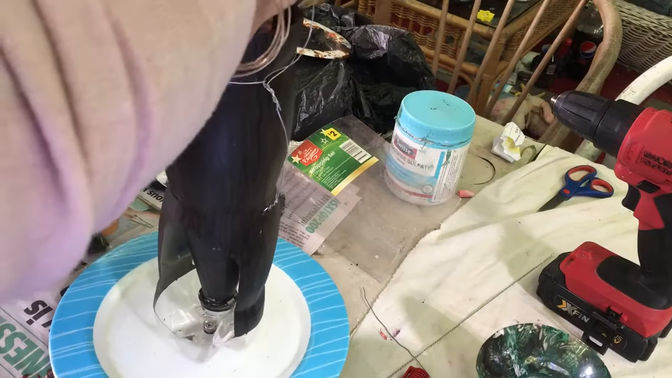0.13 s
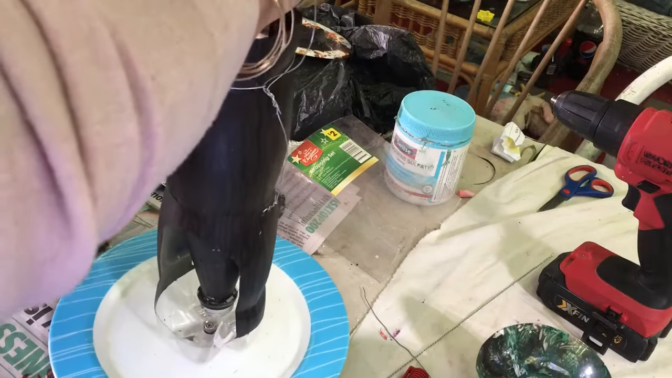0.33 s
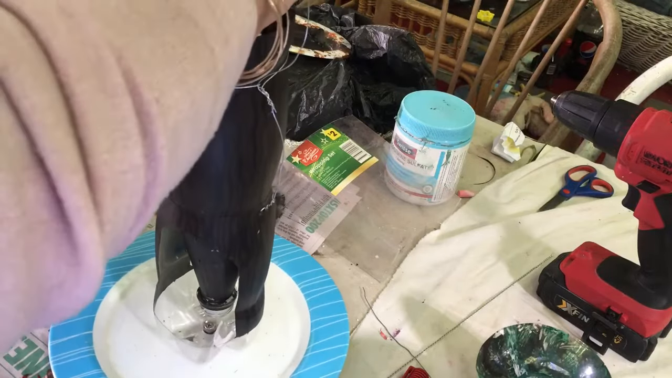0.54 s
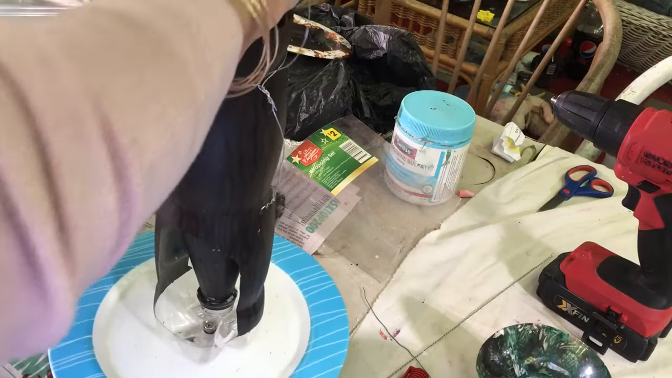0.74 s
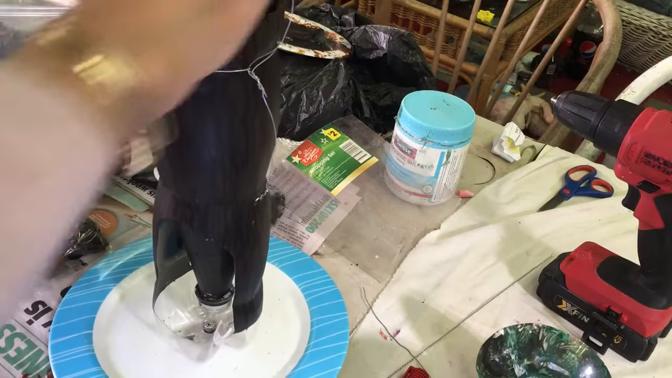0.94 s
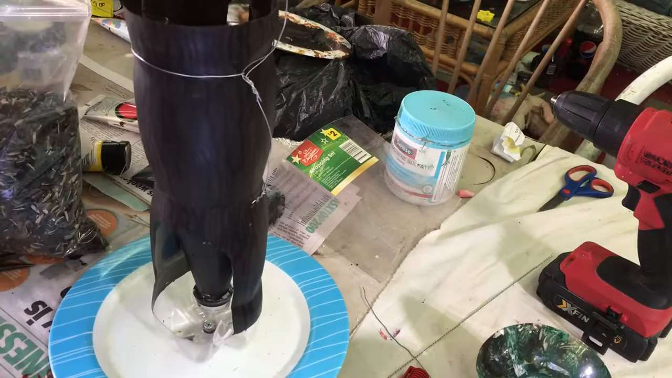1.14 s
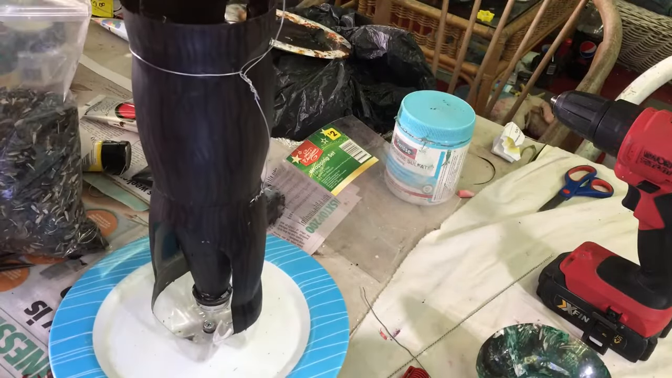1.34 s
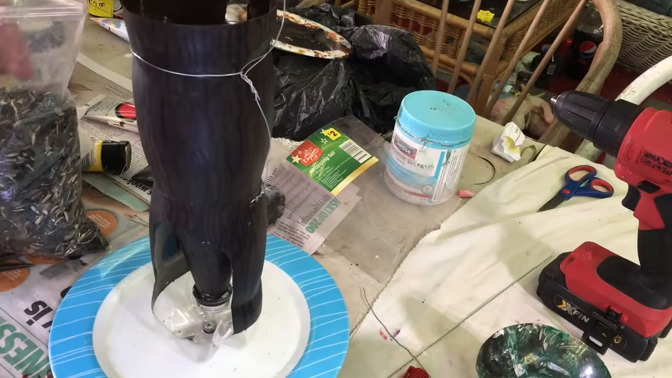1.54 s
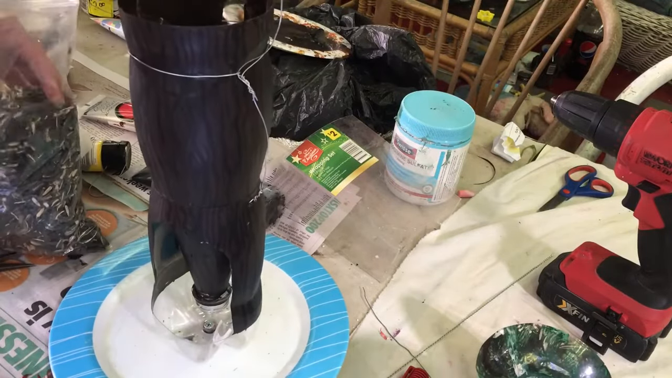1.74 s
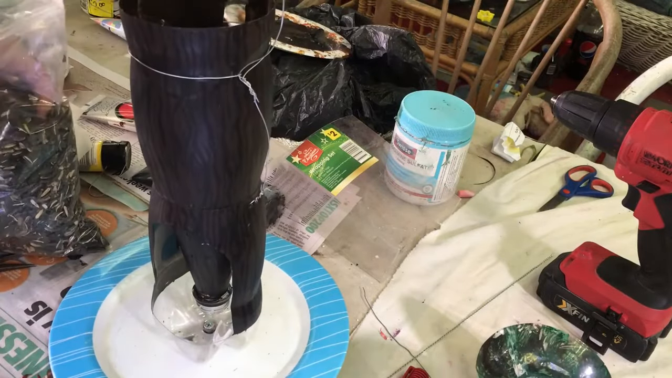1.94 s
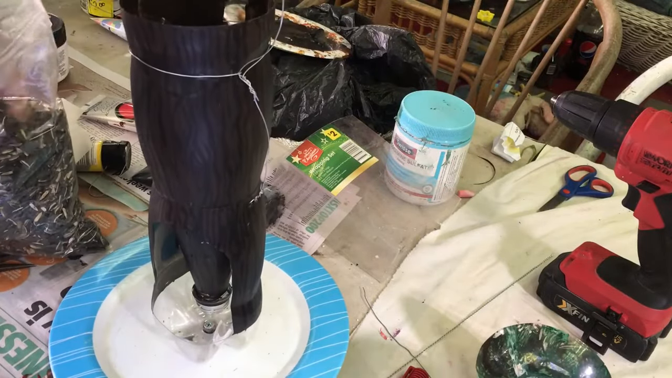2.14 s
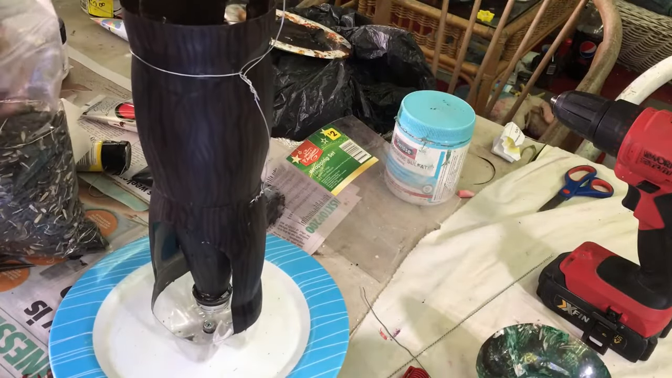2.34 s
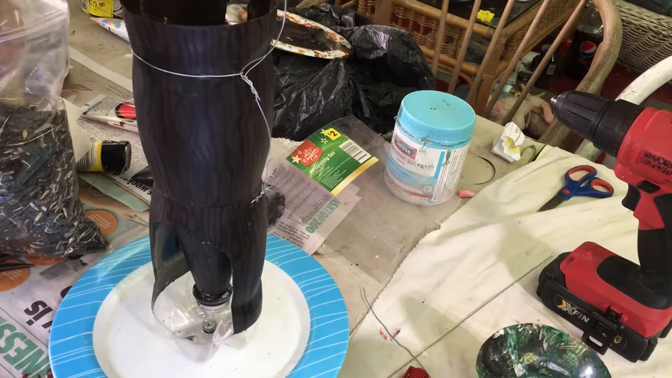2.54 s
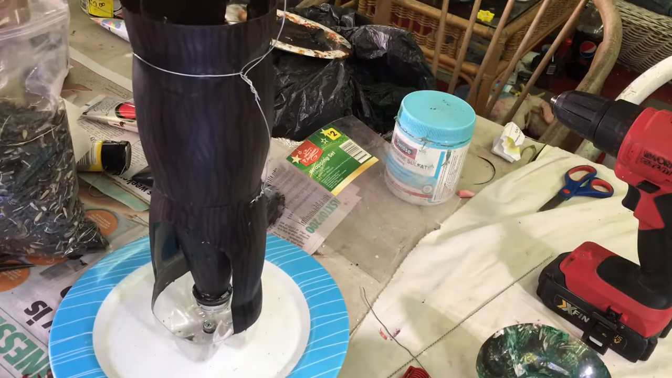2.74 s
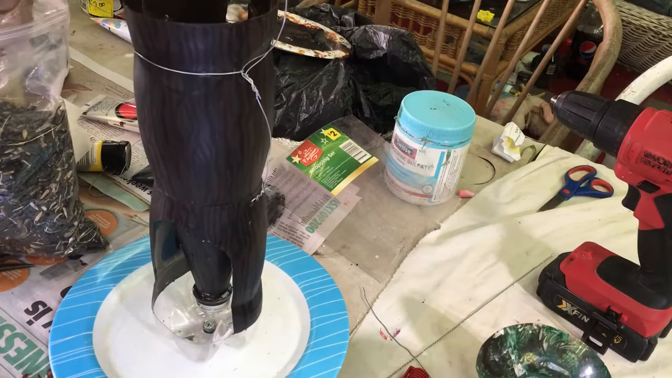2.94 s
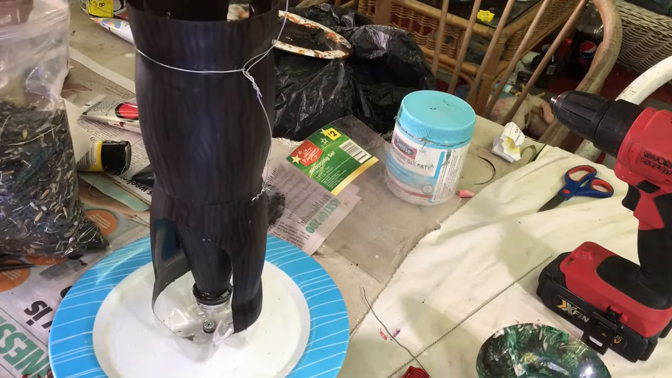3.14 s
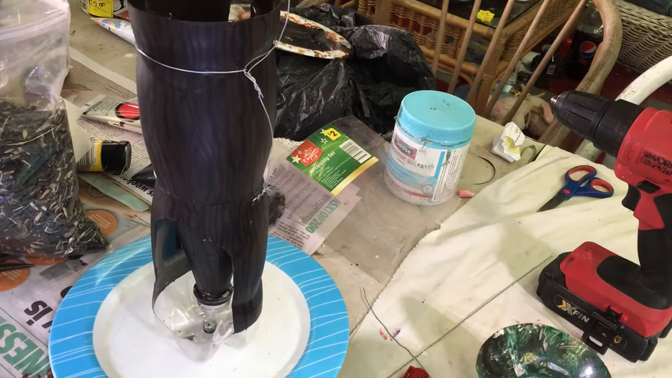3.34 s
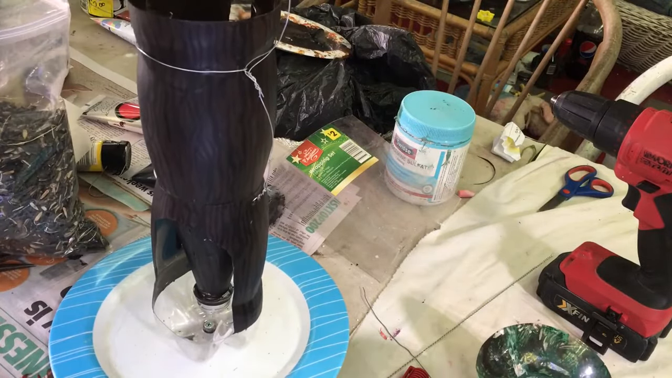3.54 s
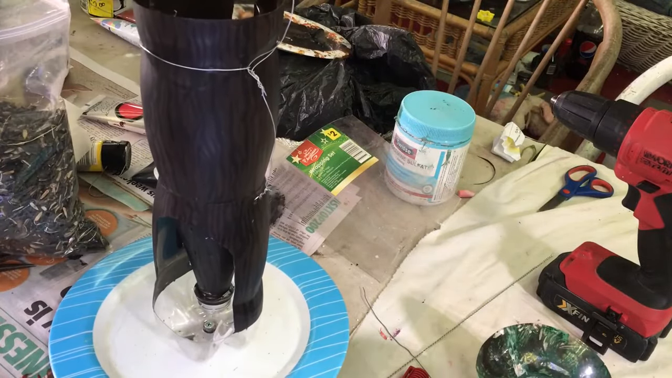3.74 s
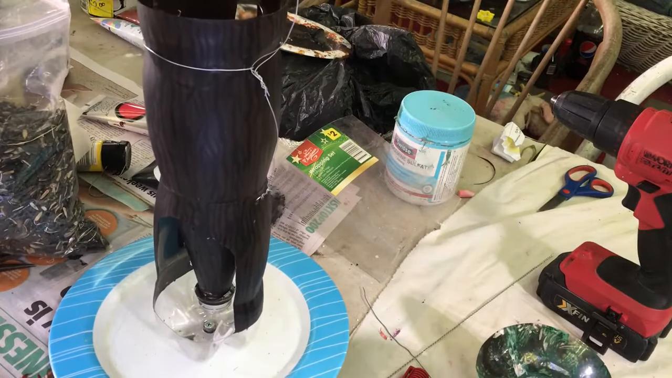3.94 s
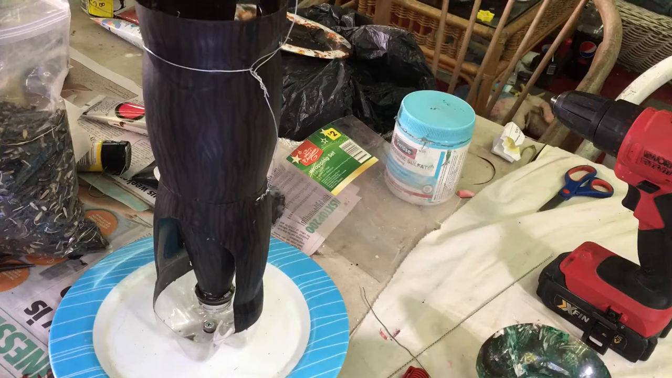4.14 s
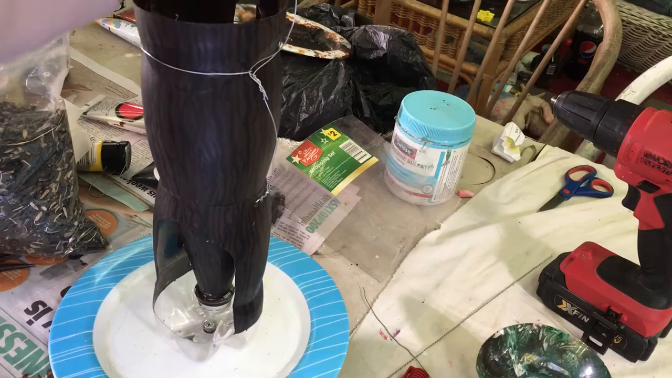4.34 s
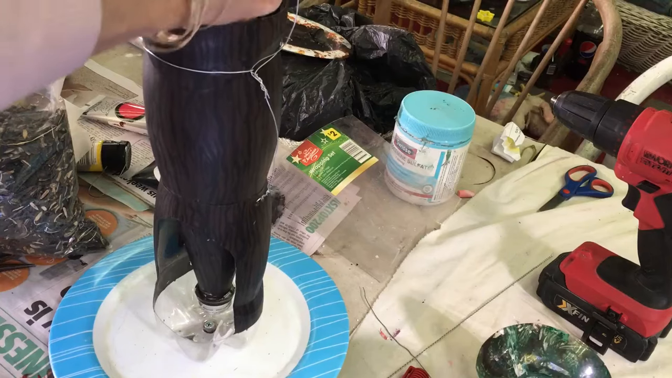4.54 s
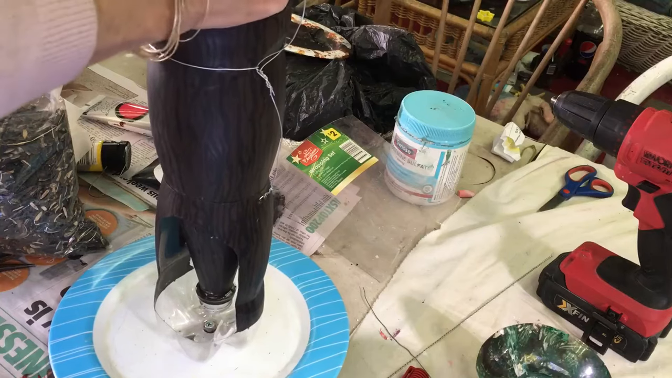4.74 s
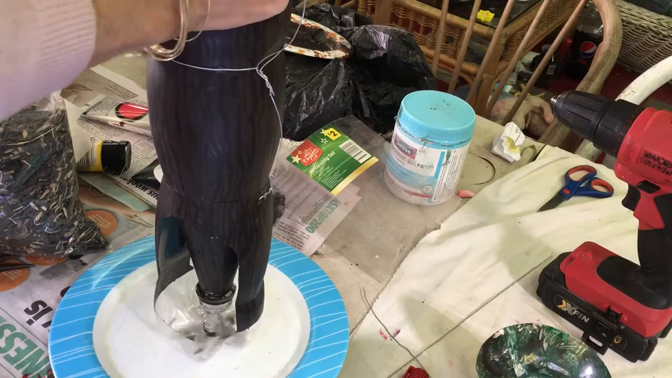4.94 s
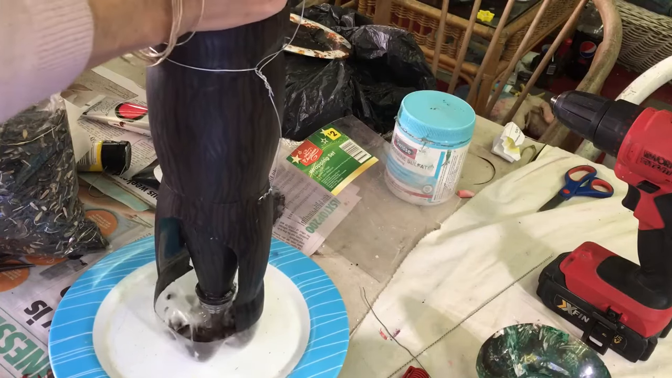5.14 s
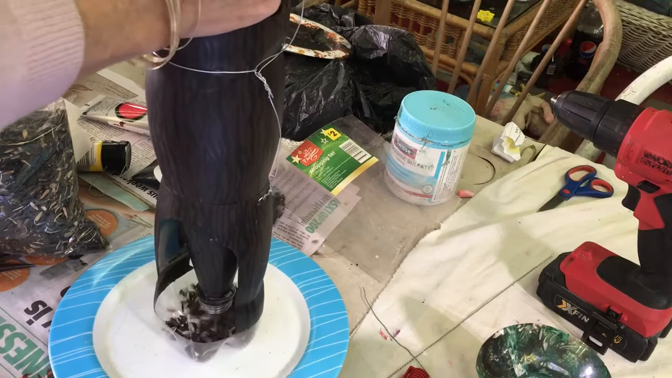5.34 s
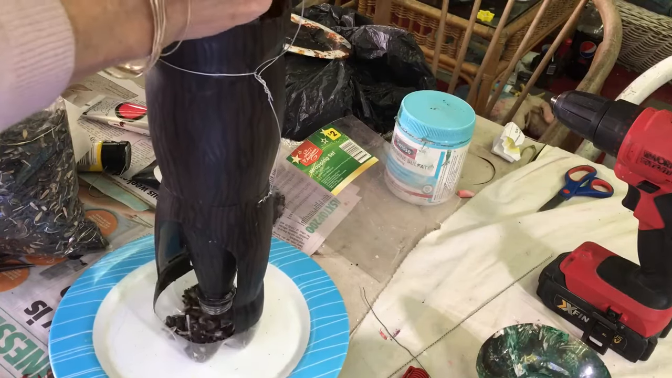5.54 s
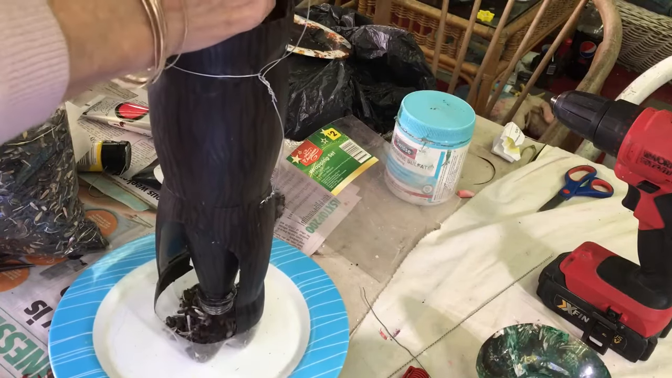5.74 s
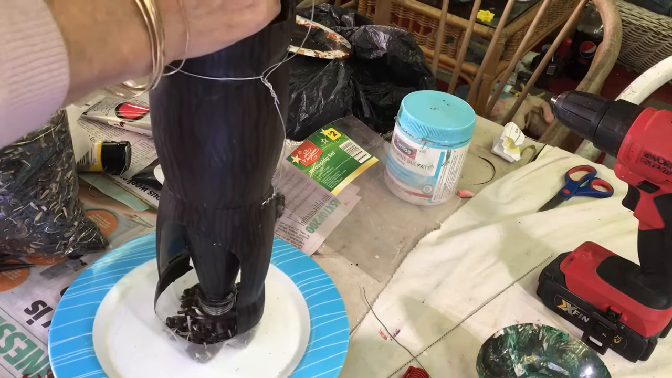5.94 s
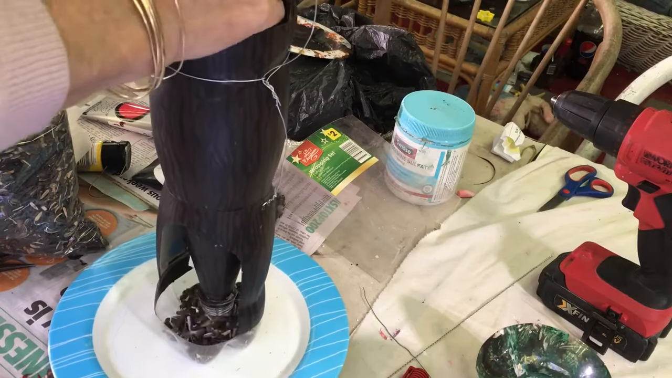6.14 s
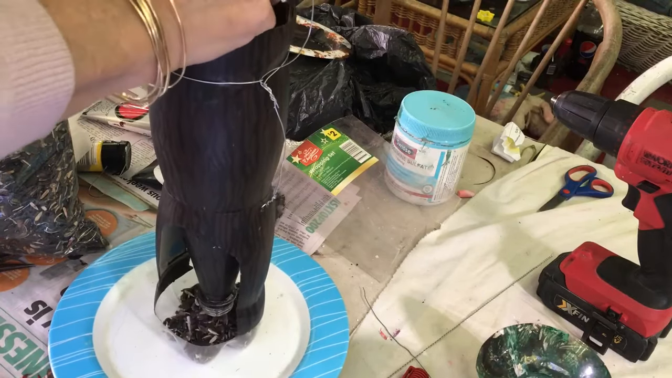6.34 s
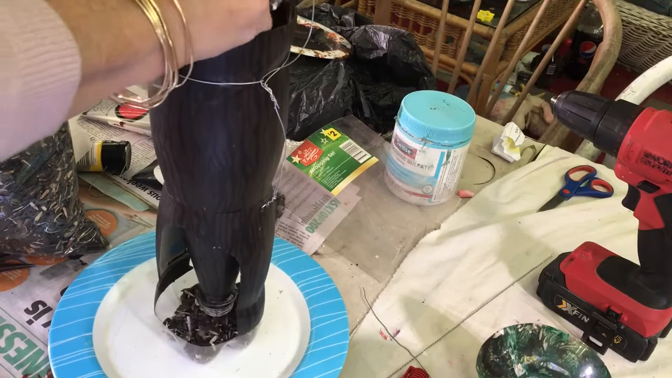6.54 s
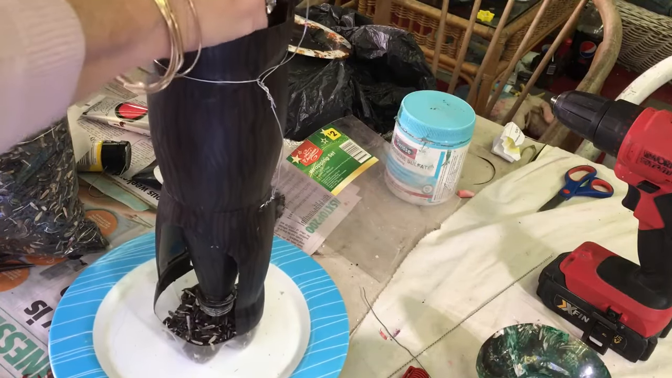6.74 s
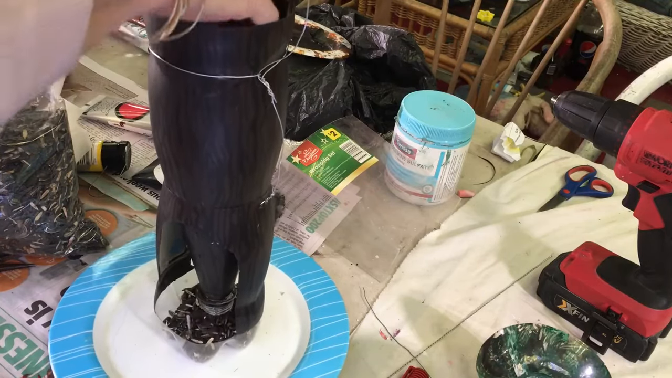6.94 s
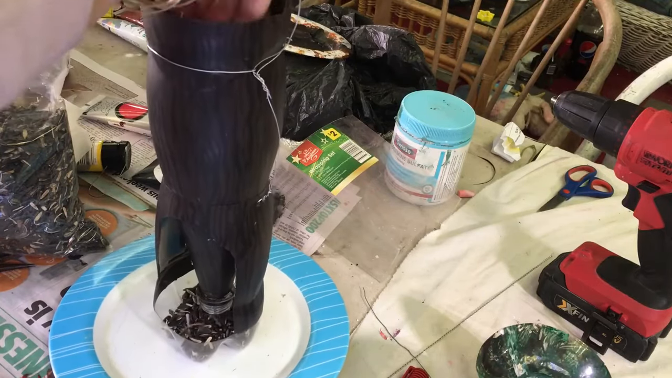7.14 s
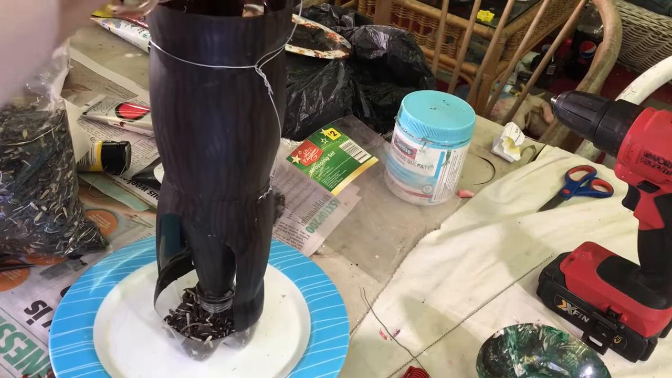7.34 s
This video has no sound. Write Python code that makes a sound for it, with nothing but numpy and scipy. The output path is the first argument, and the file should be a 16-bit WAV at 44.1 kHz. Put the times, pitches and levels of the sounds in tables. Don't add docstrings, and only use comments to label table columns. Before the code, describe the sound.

A close, fairly dry small room with low rumble, faint hiss and a far crow. From 0 to 0.8 s a hand softly rubs and taps a plastic bottle; at 0.87 s it lands with a short hollow knock and tiny rebounds. Thin bangles jingle brightly around 1.2 s. From 1.55 s a plastic bag crinkles suddenly and loudly, with sharp snaps and dull rubbing, easing by 2.7 s. Sparse finger taps remain, with faint caws, clearest near 3.6 s and a longer, deeper one at 4.6 s. Isolated seeds tick from 4.3 s, becoming louder and denser near 4.9 s. The main rush rattles hard down thin plastic from about 5.05 to 5.5 s, lightly shaking the plate, then breaks into small surges. A second, lighter pour runs from 5.95 to 6.4 s, then dribbles; a few loud seeds bounce near 7 s before the last sparse ticks at 7.4 s.

```python
import sys
import numpy as np
from scipy import signal
from scipy.fft import rfft, irfft
from scipy.io import wavfile
from scipy.ndimage import uniform_filter1d

SR = 44100
rng = np.random.default_rng(int(sys.argv[2]) if len(sys.argv) > 2 else 0)


def level_to_linear(level):
    exponent = np.asarray(level, float) / 20
    return 10 ** exponent


def materialize(psi):
    bounded = np.clip(np.atleast_2d(psi).T, -1, 1)
    quanta = np.round(bounded * 32767).astype(np.int16)
    wavfile.write(sys.argv[1], SR, quanta)


N = 329868
TIME_S = np.arange(N) / SR


def in_time(rows):
    s, *columns = np.transpose(rows)
    return [np.interp(TIME_S, s, c) for c in columns]


def at_hz(points, hz):
    point_hz, value = np.array(points).T[:2]
    return np.interp(np.log(hz), np.log(point_hz), value)


def colour(x, points):
    gain = level_to_linear(at_hz(points, np.fft.rfftfreq(16384, 1 / SR) + 1))
    cepstrum = irfft(np.log(gain))
    cepstrum[1:8192] *= 2
    cepstrum[8193:] = 0
    taps = irfft(np.exp(rfft(cepstrum)))
    return signal.fftconvolve(x, taps / np.sqrt(np.sum(taps ** 2)))[:N]


def resonance(x, hz, sharpness):
    b, a = signal.iirpeak(hz, sharpness, fs=SR)
    return signal.lfilter(b, a, x)


def white():
    return rng.standard_normal(N)


def drift(rate_hz):
    r = np.exp(-2 * np.pi * rate_hz / SR)
    slow = signal.lfilter([1], [1, -2 * r, r * r], rng.standard_normal(N + SR))[SR:]
    return slow / slow.std()


def fade(t60):
    return level_to_linear(-60 / (t60 * SR))


def place(times, gains):
    out = np.zeros(N)
    np.add.at(out, (np.asarray(times) * SR).astype(int), gains)
    return out


def burst(power, t60, tail=0):
    tail_stretch = 3.96
    swell = signal.lfilter([.12], [1, -.88], power + 1e-18)
    fast, slow = fade(t60) ** 2, fade(tail_stretch * t60) ** 2
    shape = signal.lfilter([1 + tail, -slow - tail * fast], np.poly([fast, slow]), swell)
    return np.sqrt(np.abs(shape)) * white()


def ticks(power, hz, t60, sharp, ring_db, reach, click_db, below, count=12):
    click_lag, tail_db = 20, -13
    pitches = np.geomspace(1000, 13500, count)
    patch = np.round(np.interp(np.log(hz), np.log(pitches), np.arange(count)))
    out = 0
    for k, centre in enumerate(pitches):
        own = power * (patch == k)
        puff = burst(own, t60, tail=level_to_linear(2 * tail_db))
        puff = puff + level_to_linear(click_db) * np.roll(np.sqrt(own), click_lag)
        dull = np.exp(-2 * np.pi * reach * centre / SR)
        thin = np.exp(-2 * np.pi * below * centre / SR)
        out = out + (1 - dull) ** 2 * signal.lfilter([1, -1], np.poly([dull, dull, thin]), puff)
        out = out + level_to_linear(ring_db) * np.sqrt(SR / centre) * resonance(puff, centre, sharp)
    return out


def grains(per_s, level_db, spread_db):
    sizes = level_to_linear(2 * spread_db * np.minimum(rng.exponential(1, N), 4))
    touches = rng.random(N) < per_s / SR
    return touches * sizes / sizes.mean() * level_to_linear(2 * level_db) * 1000 / per_s


def struck(hits, modes, scatter_db):
    s, hit_db = np.transpose(hits)
    chance, out = rng.standard_normal((len(hits), len(modes))), 0
    for k, (hz, mode_db, t60) in enumerate(modes):
        r, w = fade(t60), 2 * np.pi * hz / SR
        strength = level_to_linear(hit_db + mode_db + scatter_db * chance[:, k])
        clicks = place(s, strength * np.sign(chance[:, k - 1]))
        out = out + signal.lfilter([0, np.sin(w)], [1, -2 * r * np.cos(w), r * r], clicks + 1e-18)
    return out


# f/Hz, level/dB [per Hz]
AIR_COLOUR = [(30, -24), (43, -2), (66, 1), (88, -3), (100, -20), (135, -7.5), (160, -15), (384, -20),
              (520, -26.5), (1040, -29), (1650, -29.5), (5400, -40), (9000, -42), (16000, -44)]
# t/s, level/dB
HAND_EFFORT = [(0.0, -54.5), (0.16, -66), (1.3, -66.5), (1.59, -60), (1.647, -31.5), (1.76, -40),
               (1.85, -35), (2.03, -44), (2.32, -46), (2.6, -49), (2.76, -60.5), (2.94, -66), (3.3, -79)]


def air():
    still_db, shake_db = -54, -8
    shake = level_to_linear(shake_db + 1.6 * (in_time(HAND_EFFORT)[0] + 41) - 46.5)
    return np.hypot(level_to_linear(still_db), shake) * colour(white(), AIR_COLOUR)


# t/s, length [s], first f/Hz, last f/Hz, level/dB, throat pitch factor
CAWS = [
    (.56, 0.24, 298, 285, -67, 0.92),
    (1.278, 0.14, 299, 296, -61, 0.95),
    (2.736, 0.34, 318, 268, -58.5, 1.05),
    (3.612, 0.23, 328, 292, -55, 0.996),
    (4.559, .5, 299, 294, -57, 0.61),
]
# f/Hz, level/dB
THROAT = [(500, -27), (1000, -25), (1250, -13.5), (1600, -15), (1950, -4), (2250, -9.5), (2700, -51),
          (4000, -36.5)]


def crow():
    out, hoarse = np.zeros(N), drift(30)
    for start, length, first_hz, last_hz, level_db, gape in CAWS:
        part = slice(int(start * SR), int((start + length) * SR))
        along = np.linspace(0, 1, part.stop - part.start)
        rasp = hoarse[part]
        pitch_hz = first_hz + (last_hz - first_hz) * along ** 1.8 + 2.5 * rasp
        phase = 2 * np.pi * np.cumsum(pitch_hz) / SR
        voice = 0
        for k in range(2, 11):
            flutter = level_to_linear(2.5 * np.roll(hoarse, 997 * k)[part])
            voice = voice + level_to_linear(at_hz(THROAT, k * first_hz / gape)) * np.sin(k * phase + k * k) * flutter
        growl_db = 4 * np.sin(phase / 5 + 2 * rasp)
        envelope = np.sin(np.pi * along ** .7) ** .9
        out[part] += level_to_linear(level_db + 2.5 * rasp + growl_db) * envelope * voice
    return out


# t/s, length [s], level/dB
SWISHES = [
    (0, 0.014, -49.5),
    (0.086, 0.14, -61),
    (0.226, 0.094, -57),
    (0.401, 0.064, -58),
    (0.494, 0.04, -61),
    (0.763, 0.053, -58),
    (1.016, 0.032, -59.5),
]


def sleeve():
    gain = 0
    for start, length, level_db in SWISHES:
        along = np.clip((TIME_S - start) / length, 0, 1)
        gain = gain + level_to_linear(level_db) * np.sin(np.pi * along) ** 0.6
    return signal.lfilter([1], [1, -.75], gain * level_to_linear(1.2 * drift(60)) * white())


# t/s, level/dB
JINGLE = [(1.114, -53.5), (1.155, -58), (1.168, -42), (1.171, -44), (1.179, -50), (1.187, -48),
          (1.196, -53), (1.205, -55), (1.222, -51), (1.248, -59), (1.64, -41), (1.68, -37), (3.059, -63),
          (3.083, -62)]
# f/Hz, level/dB, t60 [s]
BANGLE_MODES = [(6040, -17, 0.061), (7370, -14, .05), (8790, -20.5, 0.038), (9650, -8, 0.069),
                (11000, -5, 0.065), (12070, -7, 0.063), (13020, -15, 0.05), (13500, -8, .05),
                (14490, -6, 0.054), (14800, -1.5, 0.091)]
# f/Hz, level/dB, t60 [s]
THICK_RING = [
    [(3.06, -61.5), (3.083, -58.5)],
    [(4660, -9, 0.13), (5900, -1, .06)],
]


def bangles():
    s, hit_db = np.transpose(JINGLE)
    chiff = burst(place(s, level_to_linear(2 * (hit_db - 2))), t60=0.095)
    chiff = np.diff(chiff, n=2, prepend=[0, 0])
    thin_rings = struck(JINGLE, BANGLE_MODES, scatter_db=6.0)
    return thin_rings + struck(*THICK_RING, scatter_db=5.5) + chiff


# t/s, level/dB
KNOCKS = [
    (.8708, -8),
    (.8737, -13),
    (.8768, -19.5),
]
# f/Hz, level/dB, t60 [s]
SHELL_MODES = [(328, -15.5, 0.11), (494, -4, 0.053), (1040, -3.5, 0.0066), (1180, 4.5, 0.014),
               (1480, 1, 0.011), (2150, -8, 0.017), (2455, -9, 0.02), (3530, -14.5, 0.011)]
# f/Hz, level/dB [per Hz]
SHUDDER = [(200, -7), (500, 3), (850, -11), (1200, -4.5), (1600, -3), (2600, -23), (5000, -19.5),
           (12000, -31.5)]


def knock():
    shell = struck(KNOCKS, SHELL_MODES, scatter_db=3.5)
    shell = level_to_linear(-9.0) * signal.lfilter([.6], [1, -.4], shell)
    landing = place([KNOCKS[0][0]], level_to_linear(2 * -34.0))
    return shell + colour(burst(landing, t60=0.28), SHUDDER)


# t/s, peak level/dB, ring f/Hz
SNAPS = [(1.5467, -28.0, 2340), (1.576, -22.5, 4290), (1.586, -28.5, 1750), (1.6011, -22, 3130),
         (1.6109, -24, 2150), (1.6491, -19.5, 2620), (1.6585, -11.0, 5260), (1.6788, -26.5, 2390),
         (1.6868, -13.5, 4940), (1.7013, -26, 3420), (1.7403, -30, 1770), (1.763, -26.5, 1640),
         (1.7681, -27.5, 2690), (1.7786, -35, 1980), (1.7875, -25.0, 2710), (1.794, -28.5, 2260),
         (1.8049, -24.5, 2510), (1.8346, -17, 4860), (1.845, -24.5, 1600), (1.8497, -18.5, 6710),
         (1.864, -20, 2940), (1.8996, -12.5, 3170), (1.915, -24.0, 4220), (1.931, -25.5, 4690),
         (1.9465, -22, 7270), (1.9508, -16, 2770), (1.9564, -20, 4630), (1.969, -20.0, 4390),
         (2.0267, -24, 3960), (2.04, -28, 2170), (2.0487, -31, 2020), (2.0646, -28, 3320),
         (2.0738, -20.0, 4600), (2.083, -31, 4300), (2.1357, -25.5, 1370), (2.151, -33.5, 2030),
         (2.16, -35.0, 1620), (2.1983, -26, 1510), (2.211, -28.5, 2360), (2.2202, -22.5, 5280),
         (2.2312, -28, 2810), (2.2414, -21, 3750), (2.2514, -31.5, 1820), (2.2586, -12, 5440),
         (2.3044, -25.0, 3520), (2.3753, -32, 2600), (2.4188, -26.5, 2610), (2.4352, -33, 1470),
         (2.4417, -43, 3060), (2.4964, -41.0, 1700), (2.509, -36.5, 1800), (2.5252, -40.0, 2620),
         (2.565, -40, 2440), (2.5674, -38, 1530), (2.5804, -39, 1690), (2.602, -41, 4020),
         (2.6514, -35.0, 2340), (2.6652, -38, 2520), (2.6817, -43, 6150), (2.7023, -42, 9150)]
# t/s, peak level/dB, ring f/Hz, thump level/dB [against the tick]
TAPS = [(0.1416, -37, 1770, 14), (0.1428, -36.5, 900, 12), (0.1543, -39.5, 1510, 1),
        (0.1729, -39.5, 2780, 2), (0.202, -45, 3400, 0), (0.242, -36.5, 1890, 1), (0.2934, -36.5, 3360, -3),
        (0.4155, -43, 4180, -5), (0.451, -38, 1850, -17), (0.5056, -37, 5250, -25),
        (0.622, -35.5, 4220, -26), (0.77, -41, 1680, -14), (0.782, -34.5, 1720, -15),
        (0.822, -40.5, 3960, -21), (1.3571, -39.5, 6980, -9.5), (2.729, -25, 5900, -12),
        (2.7443, -27, 5380, -9.5), (2.963, -41.5, 2883, -26), (3.0093, -48.5, 2240, -3),
        (3.0602, -47, 5680, -12), (3.285, -49, 4950, -20), (3.3346, -28.5, 3100, -15),
        (3.433, -50, 1980, 16), (3.829, -52, 3200, 1), (4.0238, -28, 4200, -0.5), (4.0327, -45.5, 2400, 5)]
# f/Hz, level/dB, t60 [s]
TABLE_MODES = [(158, -7.5, 0.085), (236, -7.5, 0.086), (317, -4.5, 0.077), (403, -3.5, 0.078),
               (486, -4.5, 0.017)]
# f/Hz, level/dB [per Hz]
BAG_COLOUR = [(290, -6.5), (500, -6.5), (761, -4), (1030, 1), (2390, 0.5), (2890, -3), (3540, -2.5),
              (10500, -7.5), (12100, -9), (16000, -16.5)]
# f/Hz, level/dB [per Hz]
THUMP = [(70, -18.5), (150, -1.5), (330, 3), (430, -10.5), (520, 4), (900, -7), (1600, -43.5)]


def bag():
    snap_thump_db, thump_follows = -35, 0.58
    rub_db, rub_lag_s = -5.5, 0.028
    shift_db, shift_follows = -10, 0.64
    pushes = [(s, db, hz, snap_thump_db + thump_follows * (db + 20.5) - db) for s, db, hz in SNAPS]
    s, peak_db, ring_hz, thump_db = np.transpose(TAPS + pushes)

    hits = place(s, level_to_linear(2 * (peak_db - 3.0)))
    snaps = ticks(hits, np.maximum(place(s, ring_hz), 1), t60=0.013, sharp=1.8, ring_db=-12.5,
                  reach=4.0, click_db=4.5, below=0.2)
    on_table = np.abs(TIME_S - 3.5) < .7
    snaps = np.where(on_table, signal.lfilter([.6], [1, -.55], snaps), snaps)

    pushed = np.transpose([s + 0.0009, peak_db + thump_db - 3])
    held = s < KNOCKS[0][0]
    thumps = struck(pushed[~held], TABLE_MODES, scatter_db=3.0)
    thumps = thumps + level_to_linear(1.5) * struck(pushed[held], SHELL_MODES[:2], scatter_db=-3.0)

    effort_db, = in_time(HAND_EFFORT)
    late_db, = in_time([(s + rub_lag_s, db) for s, db in HAND_EFFORT])
    creases = grains(500 * level_to_linear(3.0 * drift(25)), effort_db - 9, spread_db=2.5)
    crackle = ticks(creases, 900 * 2 ** (2.6 * rng.random(N)), t60=.012, sharp=2.5, ring_db=-1,
                    reach=3.5, click_db=3, below=.1)
    shifting_db = shift_db + shift_follows * (late_db + 46.0) - 45.0 + 1.5 * drift(30)
    shifting = np.diff(level_to_linear(shifting_db) * white(), prepend=0)
    rubbing = level_to_linear(late_db + rub_db + 3.8 * drift(17)) * white()
    film = colour(snaps + crackle + shifting, BAG_COLOUR)
    return film + signal.lfilter([.1], [1, -.9], thumps) + colour(rubbing, THUMP)


# t/s, length [s], first level/dB, last level/dB
SURGES = [
    (4.971, 0.068, -22.5, -16.5),
    (5.057, 0.35, -9.5, -13.5),
    (5.364, 0.23, -11.5, -21),
    (5.635, 0.086, -19, -33),
    (5.729, 0.13, -18, -21),
    (5.964, 0.18, -23.5, -23),
    (6.161, 0.15, -26.5, -19.5),
    (6.346, 0.51, -36, -58),
    (6.879, 0.15, -37.5, -39.5),
    (7.144, 0.092, -43, -58.5),
]


def surges():
    rise_db_per_s, fall_db_per_s = 902, 603
    level_db = -120
    for start, length, first_db, last_db in SURGES:
        held = first_db + (last_db - first_db) * np.clip((TIME_S - start) / length, 0, 1)
        rise = rise_db_per_s * np.maximum(start - TIME_S, 0)
        fall = fall_db_per_s * np.maximum(TIME_S - start - length, 0)
        level_db = np.maximum(level_db, held - (rise + fall))
    return level_db


# t/s, peak level/dB, ring f/Hz
FIRST_SEEDS = [(4.2741, -27.0, 7450), (4.2833, -50, 7450), (4.292, -48, 9050), (4.2984, -40, 3210),
               (4.3448, -33, 3010), (4.358, -27.5, 4160), (4.364, -33.5, 12500), (4.4037, -24.5, 10980),
               (4.4163, -49.0, 2820), (4.4223, -51.0, 2650), (4.521, -24.5, 7950), (4.5334, -45, 1300),
               (4.5407, -49.0, 6550), (4.5478, -35.5, 9650), (4.554, -39.0, 7950), (4.5816, -33.5, 6550),
               (4.6066, -50, 6980), (4.6299, -47.5, 4440), (4.64, -48.0, 4440), (4.658, -48, 1300),
               (4.668, -41, 7450), (4.7188, -48.5, 1300), (4.7512, -19, 2040), (4.76, -20, 5060),
               (4.7768, -28, 7450), (4.8207, -22, 3430), (4.8273, -23.5, 12500), (4.8543, -2.5, 7450),
               (4.8626, -14.5, 8480), (4.866, -25, 1300), (4.8726, -19.5, 5750), (4.875, -17.0, 10300),
               (4.8854, -33, 4740), (4.8942, -17.5, 8480), (4.899, -19.5, 5060), (4.9104, -20.5, 4740),
               (4.9342, -6.5, 3430), (4.9461, -16, 3010), (4.9542, -20.5, 2040), (4.9659, -4, 10980),
               (4.9698, -8.5, 7450), (4.98, -17, 1680), (4.9835, -18, 5060), (4.9876, -17.0, 12500),
               (4.991, -16, 5060), (4.9943, -9.5, 1920), (5.002, -3, 4740), (5.0114, -7, 4740),
               (5.0222, -16.0, 5390), (5.033, -6, 3210), (5.0385, -2, 2650), (5.0521, -1.0, 10980),
               (5.0553, -8.0, 3430)]
MORE_SEEDS = [
    (4.8531, -11, 8500),
    (4.6386, -50, 7000),
    (5.9185, -22, 4500),
    (6.9918, -20, 4200),
    (5.381, -9, 6000),
]
LOUD_SEEDS = [(5.0605, -0.5, 5060), (5.0763, -6, 2820), (5.0923, -4.0, 9650), (5.1, -5.5, 6980),
              (5.11, -4, 2330), (5.1275, -2, 7950), (5.1423, -4.5, 5750), (5.153, -7.5, 3660),
              (5.174, -6, 2180), (5.2224, -12.5, 9050), (5.2396, -8.5, 5060), (5.2556, -8.0, 7950),
              (5.276, -11, 1300), (5.3142, -6, 2330), (5.3964, -11.5, 3010), (5.4122, -9, 1680),
              (5.4335, -8, 1680), (5.452, -14, 1300), (5.4693, -10.5, 5060), (5.4906, -8, 3430),
              (5.5061, -8, 3210), (5.5242, -5.5, 3210), (5.5305, -10.5, 4160), (5.5362, -13, 2480),
              (5.5383, -15.5, 1800), (5.546, -22, 1300), (5.5686, -20, 4740), (5.5803, -24, 5060),
              (5.5906, -11.5, 3010), (5.598, -14.5, 3010), (5.605, -12.5, 2040), (5.6274, -18, 2650),
              (5.6315, -21, 6980), (5.6403, -20.5, 5390), (5.6497, -11, 3430), (5.653, -16.5, 6980),
              (5.6667, -23, 3660), (5.6784, -22.0, 3430), (5.6816, -23, 5750), (5.7078, -19, 3210),
              (5.7207, -18.5, 6140), (5.729, -11, 2820), (5.7367, -15.0, 5750), (5.744, -22.5, 9650),
              (5.749, -20, 3210), (5.7575, -15, 3430), (5.7663, -11, 3010), (5.773, -12, 3430),
              (5.7883, -9.5, 1800), (5.8013, -9, 3010), (5.8183, -11, 9050), (5.831, -10.5, 3010),
              (5.8347, -14.5, 11720), (5.841, -14, 3010), (5.8513, -14.0, 3900), (5.8568, -18, 1680),
              (5.8607, -17.0, 5060), (5.8644, -23, 10980), (5.8723, -10.0, 3210), (5.884, -18, 3010)]
LATER_SEEDS = [(5.909, -18, 6980), (5.9214, -17.5, 2650), (5.9431, -19, 3210), (5.9586, -23, 1390),
               (5.9682, -12, 3210), (5.981, -12.5, 2330), (5.985, -13, 5750), (5.9924, -15, 7950),
               (6.013, -23, 2180), (6.015, -21, 2480), (6.0325, -22, 2820), (6.0429, -13.0, 9650),
               (6.0463, -13.0, 4440), (6.0604, -26, 3010), (6.0653, -12, 1800), (6.076, -16, 3210),
               (6.086, -12.5, 7950), (6.0945, -17, 7950), (6.1049, -21.5, 9650), (6.1167, -4.0, 4160),
               (6.129, -15.0, 1390), (6.137, -14.0, 5750), (6.1442, -18, 3210), (6.161, -15, 3660),
               (6.1676, -16, 3010), (6.174, -13, 3010), (6.1805, -15, 3210), (6.2, -11.0, 2650),
               (6.2073, -13, 4160), (6.2149, -15, 3010), (6.2272, -17.0, 6980), (6.24, -12, 10300),
               (6.2477, -7.5, 4160), (6.253, -11, 2650), (6.274, -17, 3900), (6.2943, -12, 3430),
               (6.319, -38, 2180), (6.334, -24.0, 4160), (6.3374, -21, 2330), (6.349, -18, 3210),
               (6.3529, -16, 2480), (6.3763, -17, 2330), (6.3786, -14.5, 7950), (6.402, -20.0, 10980),
               (6.4125, -9.0, 7450), (6.4192, -15.0, 10300), (6.4245, -17.0, 11720), (6.447, -22.0, 12500),
               (6.4527, -20, 6140), (6.4757, -20, 6140)]
LAST_SEEDS = [(6.491, -32, 9050), (6.4965, -39, 8480), (6.5129, -36.0, 4160), (6.5166, -29.0, 3010),
              (6.525, -34.0, 6140), (6.5325, -33, 2650), (6.5387, -36.0, 1680), (6.5547, -35.0, 3010),
              (6.566, -34, 4160), (6.592, -48, 10980), (6.6039, -16.5, 4160), (6.612, -31.0, 2180),
              (6.6248, -21.5, 4160), (6.6315, -25, 3430), (6.6409, -31.0, 3430), (6.6522, -22.5, 3010),
              (6.655, -30, 1300), (6.662, -29, 12500), (6.6893, -41, 9650), (6.706, -23.5, 1800),
              (6.719, -26, 3900), (6.737, -42, 2180), (6.7448, -38.0, 10980), (6.7992, -37.5, 6140),
              (6.8497, -30.5, 3430), (6.8758, -18.5, 2650), (6.8847, -18, 5060), (6.9, -38, 4160),
              (6.918, -32, 4160), (6.9263, -13.5, 1480), (6.948, -19, 10300), (6.955, -25.0, 3210),
              (6.978, -5.5, 3430), (6.9935, -12.5, 3430), (6.997, -14, 3430), (7.0093, -23, 2820),
              (7.012, -29, 3210), (7.0266, -18, 3430), (7.041, -37, 9650), (7.0693, -27.0, 8480),
              (7.0821, -32, 4160), (7.0933, -27, 9050), (7.1384, -33, 10300), (7.1462, -21, 5060),
              (7.1545, -30, 4160), (7.1761, -24, 9650), (7.1798, -18, 5390), (7.206, -32, 12500),
              (7.212, -35, 3660), (7.2335, -44, 6980), (7.2346, -39.5, 11720), (7.2529, -46, 6140),
              (7.2692, -41, 1300), (7.3946, -33, 1680), (7.4077, -28.5, 2180), (7.414, -48.0, 1920),
              (7.424, -48, 1680)]
# f/Hz, level/dB [per Hz]
BOTTLE_COLOUR = [(150, -27.5), (330, -21), (720, -25), (1200, -13.5), (2000, -12), (3300, -5.5), (4000, -4),
                 (4700, -8.5), (6400, -5), (7600, -9.5), (9400, -5), (12400, -5.5), (14000, -7.5),
                 (16000, -9.5)]
# f/Hz, width [Hz], level/dB
NECK_POCKETS = [(1510, 760, 0.5), (3700, 100, -4)]


def seeds():
    heavy_per_s, heavy_db = 88, -14
    all_seeds = FIRST_SEEDS + MORE_SEEDS + LOUD_SEEDS + LATER_SEEDS + LAST_SEEDS
    s, peak_db, ring_hz = np.transpose(all_seeds)
    s = s - .0003
    hits = place(s, level_to_linear(2 * (peak_db - 4.0)))
    single = ticks(hits, np.maximum(place(s, ring_hz), 1), t60=0.0096, sharp=2.63, ring_db=-7,
                   reach=2.2, click_db=10.5, below=.3)

    level_db = surges()
    per_s = 2300 * level_to_linear(.4 * (level_db + 16.5) + 1.3 * drift(43))
    power = grains(per_s, level_db - 5.5, spread_db=1.5)
    power = power + grains(heavy_per_s, level_db + heavy_db, spread_db=3.0)
    stream = ticks(power, 1100 * 2 ** (3.6 * rng.random(N)), t60=.004, sharp=3.0, ring_db=-1,
                   reach=5.0, click_db=8, below=.15)
    rattle = colour(single + stream, BOTTLE_COLOUR)

    pile = np.clip((TIME_S - 5.2) / 1.8, 0, 1) ** 2
    pockets = 0
    for hz, width_hz, gain_db in NECK_POCKETS:
        pockets = pockets + level_to_linear(gain_db) * resonance(rattle, hz, hz / width_hz)
    body = level_to_linear(-36.5 + 2 * drift(3.0)) * colour(burst(power, t60=0.077), THUMP)
    body += 3.0 * (1 - pile) ** 4 * resonance(body, 360, 12.0)
    return rattle + pile * pockets + body


def room(x):
    t60_s = 0.19
    t = np.arange(int(.4 * SR)) / SR
    tail = rfft(rng.standard_normal(len(t)) * level_to_linear(-60 * t / t60_s) * (t > .004))
    tail = irfft(tail / np.sqrt(uniform_filter1d(np.abs(tail) ** 2, size=60)))
    tail = signal.lfilter([1], [1, -.35], tail)
    return signal.fftconvolve(x, tail / np.sqrt(np.sum(tail ** 2)))[:N]


def scene():
    far = crow()
    near = sleeve() + bangles() + knock() + bag() + seeds()
    background = air() + far + level_to_linear(0.5) * room(far)
    return (background + near + level_to_linear(-15.5) * room(near))[None]


def top_cut(x):
    return signal.sosfilt(signal.butter(12, 16470, fs=SR, output="sos"), x)


def record(dry):
    dip = dry - .5 * resonance(dry, 10400, 12.0)
    cut = signal.sosfilt(signal.cheby2(14, 45, 16050, fs=SR, output="sos"), dip)
    cut = signal.sosfilt(signal.butter(4, 38, "high", fs=SR, output="sos"), cut)
    return top_cut(np.clip(cut, -1, 1))


dry = scene()
out = record(dry)
materialize(out)
```